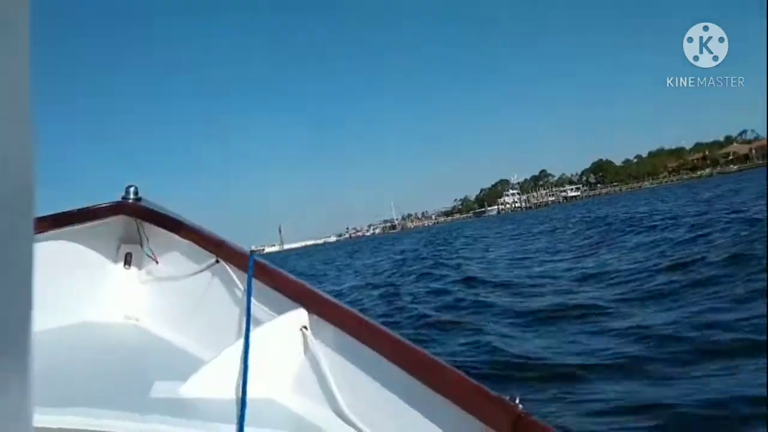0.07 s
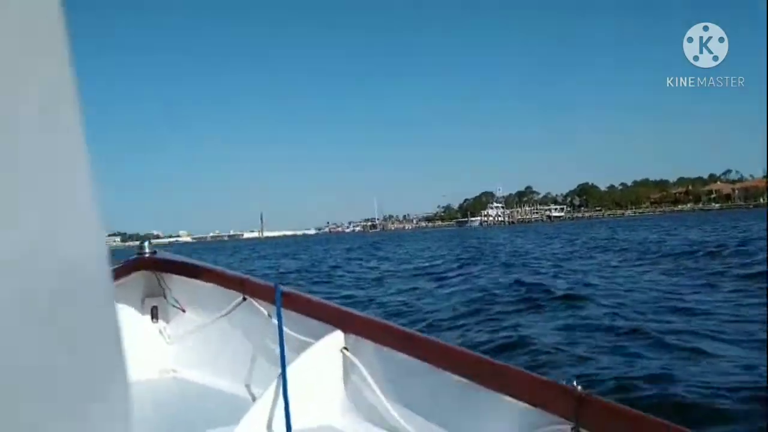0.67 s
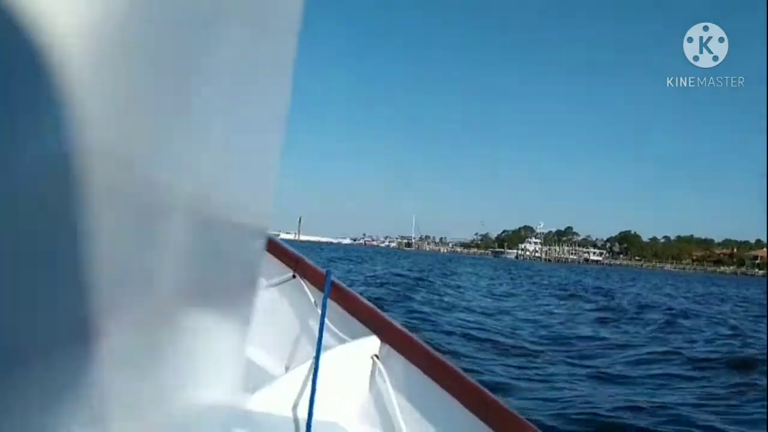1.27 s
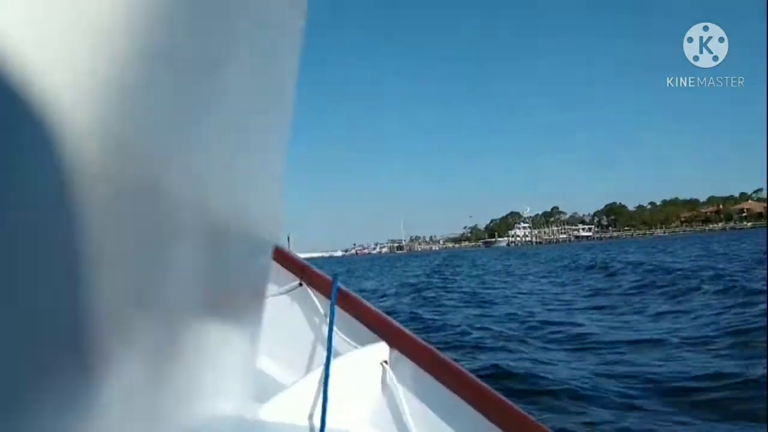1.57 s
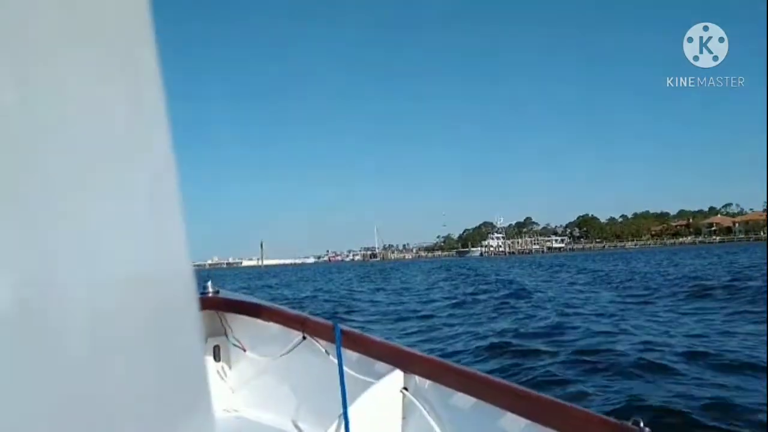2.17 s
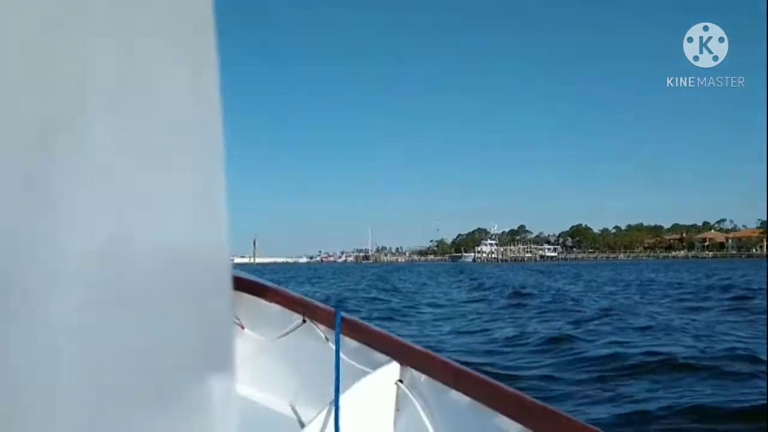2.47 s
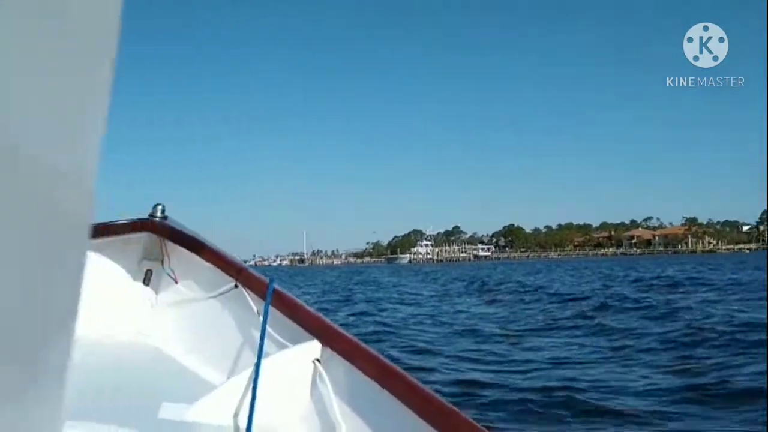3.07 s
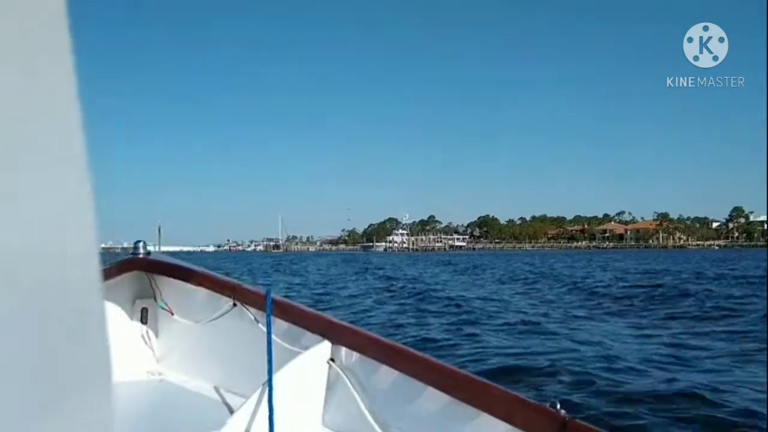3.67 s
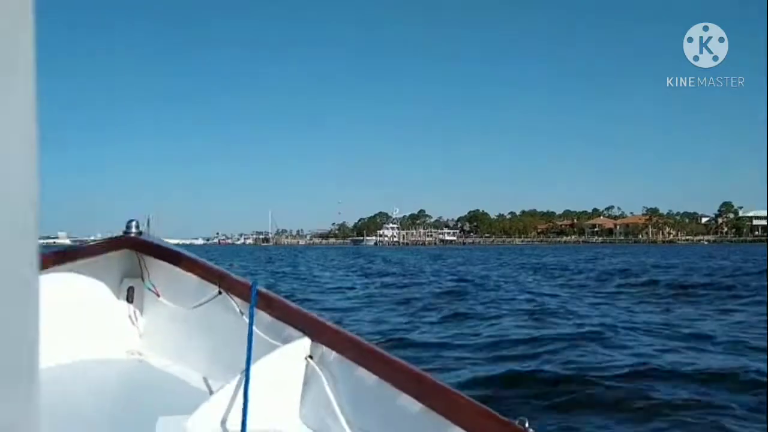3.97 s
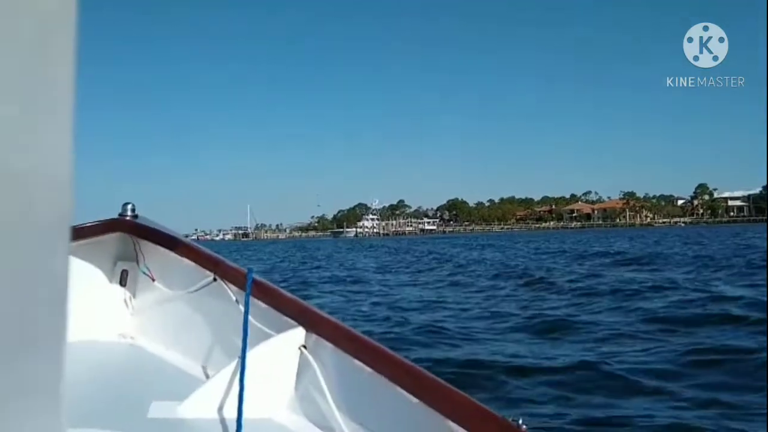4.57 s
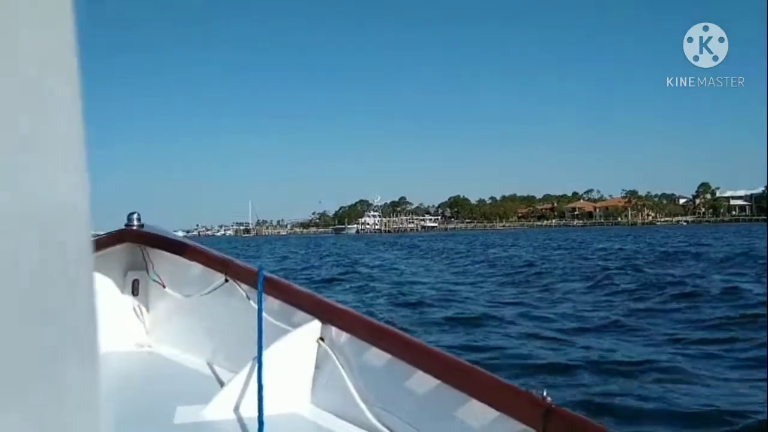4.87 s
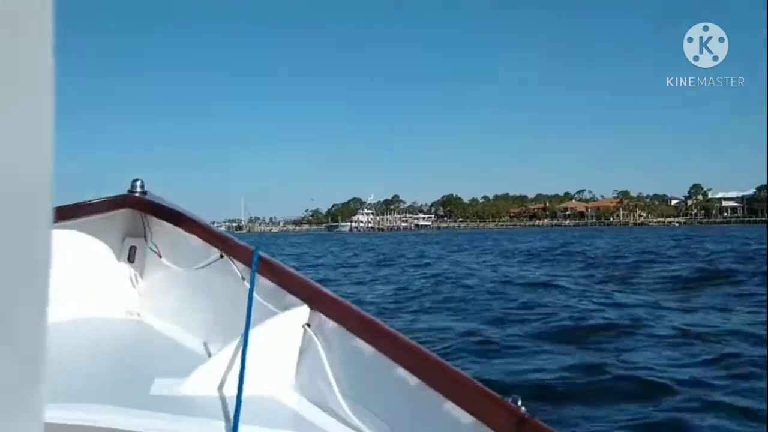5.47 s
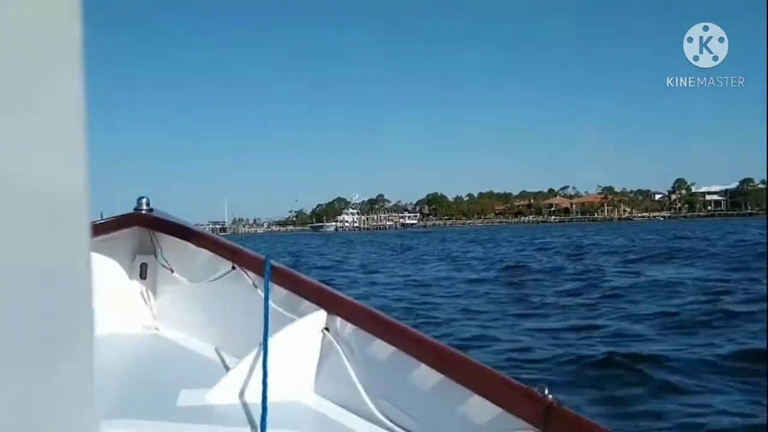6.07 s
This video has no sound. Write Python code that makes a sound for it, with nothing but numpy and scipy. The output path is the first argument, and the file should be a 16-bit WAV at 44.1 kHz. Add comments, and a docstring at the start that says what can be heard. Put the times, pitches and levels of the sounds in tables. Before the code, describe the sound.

Heard from aboard a small boat on open water, wind buffets the microphone in uneven gusts while waves slosh, gurgle and thud against the hull. Crests break on the bow, drops tick and wavelets knock underneath. After a calmer moment, the barely audible outboard motor opens up toward the end, its whine climbing in pitch over the rushing water.

```python
"""A small open boat pushes through choppy water, with wind buffeting the two microphone ports.
From the start, waves wash along the hollow hull, plop against the planks and slap air into booming pockets.
Crests break on the bow, drops tick, bubbles burst, and from one second on, wavelets knock underneath.
Near five seconds the outboard motor whines up from a faint idle, exhaust chugging, and the wash grows.
Throughout, each port is fed, late and inverted, into the other channel to widen the stereo image."""
import sys
import numpy as np
from scipy import signal
from scipy.fft import rfft, irfft, next_fast_len
from scipy.io import wavfile

SR = 44100
rng = np.random.default_rng(int(sys.argv[2]) if len(sys.argv) > 2 else 0)


def generate_wav(sig):
    """Save sig (samples, or channels by samples) to the path in sys.argv[1] as 16-bit PCM at SR."""
    pcm = np.round(np.clip(np.atleast_2d(sig).T, -1, 1) * 32767).astype(np.int16)
    wavfile.write(sys.argv[1], SR, pcm)


N = 278271
TIME = np.arange(N) / SR
MESHES_PER_CYCLE = 24   # gear teeth that engage in one engine cycle
# The motor idles, then speeds up. Each row: time in seconds, gear mesh rate in Hz.
MOTOR_SPEED = [(0, 298), (4.8, 299), (4.9, 326), (5.0, 374), (5.12, 404), (5.3, 432), (5.6, 450),
               (6.03, 463), (6.31, 485)]


def from_db(db):
    """Decibels to gain."""
    return 10 ** (np.asarray(db) / 20)


def rms_one(x):
    """Scale to unit rms."""
    return x / np.sqrt(np.mean(x ** 2) + 1e-20)


def automation(rows):
    """A curve through (seconds, value) points, at every sample."""
    return np.interp(TIME, *np.transpose(rows))


def add(out, start_s, sound):
    """Mix a sound in at its start time."""
    start = max(0, round(start_s * SR))
    out[..., start:start + sound.shape[-1]] += sound[..., :N - start]


def filtered(x, kind, hz, order=2):
    """Causal Butterworth filter."""
    return signal.sosfilt(signal.butter(order, hz, kind, fs=SR, output="sos"), x + 1e-18)


def resonance(x, hz, width_hz):
    """Two-pole band-pass with unity gain at its peak."""
    r = np.exp(-np.pi * width_hz / SR)
    feedback = [1, -2 * r * np.cos(2 * np.pi * hz / SR), r * r]
    return signal.lfilter(np.array([1, 0, -1]) * (1 - r * r) / 2, feedback, x)


def drift(rate):
    """Smooth random modulation of spread 1, changing about `rate` times a second."""
    hop, settle = 40, 2000
    r = np.exp(-2 * np.pi * hop * rate / SR)
    white = rng.standard_normal(N // hop + settle + 2)
    slow = signal.lfilter([1], [1, -2 * r, r * r], white)[settle:]
    return np.interp(np.arange(N) / hop, np.arange(len(slow)), rms_one(slow))


def coloured(x, spectrum):
    """Shape a signal with an EQ curve of (Hz, dB) points; unit rms."""
    size = next_fast_len(N)
    hz, db = np.transpose(spectrum)
    bin_hz = np.arange(size // 2 + 1) * SR / size
    gain = from_db(np.interp(np.log(bin_hz + 1), np.log(hz), db))
    return rms_one(irfft(rfft(x, size) * gain, size)[:N])


def noise(spectrum):
    """Smooth coloured noise; unit rms."""
    return coloured(rng.standard_normal(N), spectrum)


def at_ports(common, apart, apart_hz, apart_db):
    """Lows reach both ports alike, highs differ between them."""
    return common + from_db(apart_db) * filtered(apart, "high", apart_hz, order=1) * [[1], [-1]]


def wind(steady_db=-4.5, lumpy_db=4, eddies_per_s=30, eddy_db=10, puff_db=6, lee_db=-5):
    """Lumpy turbulence rumbles at both ports; single eddies thump the windward one."""
    # The breeze swells and slackens. Each row: time in seconds, relative level in dB.
    breeze = [(0, -21), (0.8, -19.5), (1.25, -32.5), (1.58, -19), (1.85, -30.5), (2.15, -17.5), (2.47, -41),
              (2.8, -26), (3.0, -35), (3.25, -18.5), (3.47, -32), (3.85, -30.5), (4.05, -19.5),
              (4.25, -19.5), (4.78, -26), (5.2, -24), (5.7, -14.5), (6.31, -29.5)]
    # The strongest eddies. Each row: start in seconds, relative level in dB.
    puffs = [(0.011, -4.5), (0.077, -9), (1.097, -12), (1.611, -17.5), (3.72, -16), (4.165, -6),
             (4.183, -8.5), (4.234, -13.5), (4.262, -14), (4.274, -3), (4.404, -17), (4.507, -15),
             (4.536, -11), (4.591, -3), (4.642, -14), (4.652, -14), (5.401, -5), (5.563, -6), (5.758, -6.5),
             (5.819, -8.5)]
    # Tone of the turbulence. Each row: frequency in Hz, relative level in dB.
    buffet_eq = [(20, -29.5), (40, -37.5), (70, -5), (125, 3), (200, -1), (300, -22.5), (450, -33),
                 (800, -32.5), (1600, -38), (4000, -73.5)]
    flow = from_db(automation(breeze))
    windward, lee = [from_db(steady_db + lumpy_db * drift(22)) * flow * noise(buffet_eq)
                     for port in range(2)]
    eddies = rng.random(N) < eddies_per_s / SR
    kicks = eddies * rng.uniform(0, 1, N) * flow * from_db(eddy_db)
    for start, db in puffs:
        kicks[round(start * SR)] += from_db(db + puff_db)
    low_hz, high_hz = 95, 290
    thumps = filtered(kicks, "band", [low_hz, high_hz]) * SR / (2 * high_hz)
    return np.array([windward + filtered(thumps, "low", 373), from_db(lee_db) * lee])


def each_cycle(cycles, harmonic_db):
    """A wavetable that loops once per engine cycle, its harmonics in random phase."""
    size = 8192
    harmonics = from_db(harmonic_db) * np.exp(2j * np.pi * rng.random(len(harmonic_db)))
    shape = irfft(np.append(0, harmonics), size) * size / 2
    return np.interp(cycles % 1, np.arange(size) / size, shape)


def gear_whine(cycles, uneven=.42, wander=.17, flutter_db=1.5, top_hz=3200, partials=8):
    """Uneven teeth give fluttering, rasping partials that swell as they climb through resonances."""
    # Resonances of the motor housing. Each row: frequency in Hz, width in Hz, gain in dB,
    # phase between the ports in degrees.
    housing = [(780, 40, -48, 35), (905, 40, -42.5, 55), (1370, 170, -42.5, 60), (1620, 90, -48.5, 100),
               (1950, 90, -53.5, 80), (2210, 160, -50, 130), (2470, 60, -54, 140), (2900, 300, -66.5, 35)]
    teeth = 0
    for k in range(1, partials + 1):
        phase = 2 * np.pi * k * MESHES_PER_CYCLE * cycles + wander * k * drift(50)
        lumps = 1 + uneven * each_cycle(cycles, -4 * np.arange(4))
        flutter = from_db(flutter_db * drift(30))
        teeth = teeth + np.sqrt(2) * lumps * flutter * np.exp(1j * phase)
    teeth = filtered(teeth, "low", top_hz, order=4)
    out = np.zeros((2, N))
    for hz, width, db, degrees in housing:
        port_phase = np.exp(np.array([[.5j], [-.5j]]) * np.radians(degrees))
        out += from_db(db) * resonance(np.real(teeth * port_phase), hz, width)
    return out


def exhaust(cycles, direct_db=-1, burble_db=-9):
    """Three uneven firings a cycle beat through the hull, and each blows a puff of bubbles."""
    # Outline of the beat's weaker harmonics. Each row: multiple of the engine cycle, relative level in dB.
    beat_outline = [(3, -22), (7, -7), (16, -6), (22, -11), (46, -28)]
    # Its strongest harmonics. Each row: multiple of the engine cycle, relative level in dB.
    strong_harmonics = [(4, -6), (6, 10), (10, 4), (13, 1), (14, 1), (17, 2)]
    # Resonances of the hull. Each row: frequency in Hz, width in Hz, gain in dB.
    hull_modes = [(180, 16, 0), (259, 18, 5), (325, 30, -7)]
    harmonic_db = np.interp(np.arange(1, 2 * MESHES_PER_CYCLE), *np.transpose(beat_outline))
    for multiple, db in strong_harmonics:
        harmonic_db[round(multiple) - 1] = db
    beat = each_cycle(cycles, harmonic_db) * from_db(1.8 * drift(25))
    firings = 1 + np.cos(2 * np.pi * 3 * cycles)
    burble = firings * rms_one(filtered(rng.standard_normal(N), "band", [130, 450]))
    chug = beat + from_db(burble_db) * burble
    hull_ring = sum(from_db(db) * resonance(chug, hz, width) for hz, width, db in hull_modes)
    return from_db(direct_db) * chug + hull_ring


def motor(exhaust_db=-36.3, exhaust_follows=.4):
    """One slightly unsteady speed drives gears and exhaust; the load brings both in."""
    # The throttle opens and loads the motor. Each row: time in seconds, gain in dB.
    load = [(4.76, -44), (4.82, -4), (4.96, -6.5), (5.1, -.5), (5.7, -.5), (6.0, -2.5), (6.25, 2.5)]
    mesh_hz = automation(MOTOR_SPEED) * (1 + .002 * drift(10))
    cycles = np.cumsum(mesh_hz) / SR / MESHES_PER_CYCLE
    load_db = automation(load)
    whine = from_db(load_db) * gear_whine(cycles)
    return whine + from_db(exhaust_db + exhaust_follows * load_db) * exhaust(cycles)


def bubble(t, hz, t60, rise):
    """A pocket of air rings down; its pitch climbs as it nears the surface."""
    t = np.maximum(t, 0)
    bend = 1 + rise * np.minimum(t / t60, 1)
    return np.sin(2 * np.pi * hz * t * bend) * from_db(-60 * t / t60)


def gurgle(per_s, low_hz, high_hz, cycles, spread_db, candidates=4000):
    """A crowd of small bubbles of random size and pitch; unit rms."""
    out = np.zeros(N)
    for when, pitch, size, chance in rng.random((candidates, 4)):
        if chance < per_s * N / SR / candidates:
            hz = low_hz * (high_hz / low_hz) ** pitch
            t60 = cycles / hz
            gain = from_db(spread_db * min(-np.log(1 - size), 4))
            add(out, when * (N - 1) / SR, gain * bubble(TIME[:int(t60 * SR)], hz, t60, rise=0.19))
    return rms_one(out)


def patter(spectrum, per_s, spread_db):
    """A hail of droplets of uneven size; unit rms."""
    sizes = from_db(spread_db * np.minimum(rng.exponential(1, N), 5)) * rng.choice([-1, 1], N)
    return coloured(sizes * (rng.random(N) < per_s / SR), spectrum)


def swell(start, length, t60, rise_s=.014):
    """One wave builds up, holds for its length and drains away."""
    t = np.maximum(TIME - start, 0)
    return (1 - np.exp(-t / rise_s)) * from_db(-60 * np.maximum(t - length, 0) / t60)


def water_strength(speed_ratio, idle_churn_db=-43.5, idle_spray_db=-58):
    """Gains of churn and spray: the steady wash grows with speed, and each wave adds its power."""
    # Waves run along the hull. Each row: start in seconds, length in seconds, churn and spray gains in dB.
    waves = [(0.015, 0.033, -31, -43.5), (0.322, 0.63, -32.5, -52), (0.597, 0.2, -24.5, -42.5),
             (0.824, 0.02, -25, -41.5), (1.097, 0.23, -29.5, -47.5), (1.373, 0.029, -28, -47.5),
             (1.738, 0.022, -25.5, -50), (1.917, 0.08, -28.5, -44), (2.09, 0.07, -24, -45.5),
             (2.537, 0.14, -30.5, -50), (2.905, 0.02, -38, -49.5), (3.239, 0.058, -32.5, -49),
             (3.46, 0.041, -38, -48), (3.953, 0.037, -30, -53), (4.152, 0.22, -54, -57),
             (4.586, 0.13, -35.5, -53.5), (4.789, 0.76, -33, -48.5), (5.725, 0.11, -25, -49.5)]
    octaves = np.log2(speed_ratio)
    churn_power = from_db(idle_churn_db + 6 * octaves) ** 2
    spray_power = from_db(idle_spray_db + 16 * octaves) ** 2
    for start, length, churn_db, spray_db in waves:
        churn_power += (from_db(churn_db) * swell(start, length, t60=0.81)) ** 2
        spray_power += (from_db(spray_db) * swell(start, length, t60=0.89)) ** 2
    return np.sqrt(churn_power), np.sqrt(spray_power)


def wash(rumble_db=1, spray_db=-1, glug_db=-10, fizz_db=-10, churn_flicker_db=2.5, spray_flicker_db=1.8):
    """Water drums along the hull, hisses off the bow and bursts into bubbles."""
    # Tones of the drumming water and of the spray. Each row: frequency in Hz, relative level in dB.
    rumble_eq = [(30, -59), (60, -36), (110, 10), (180, 10.5), (300, 7), (500, -4.5), (800, -14),
                 (1300, -25), (2000, -26), (4000, -53.5)]
    spray_eq = [(300, -13), (700, 15.5), (1300, 9), (1900, 1.5), (2400, 3.5), (3100, -3), (4200, -6.5),
                (5500, -14.5), (7000, -23.5), (10000, -23), (15500, -23)]
    speed_ratio = automation(MOTOR_SPEED) / MOTOR_SPEED[0][1]
    churn, spray = water_strength(speed_ratio)
    body_gain = from_db(rumble_db + churn_flicker_db * drift(14.5))
    body = body_gain * at_ports(noise(rumble_eq), noise(rumble_eq), apart_hz=1200, apart_db=5.5)
    droplets = [patter(spray_eq, per_s=7000, spread_db=3.5) for part in range(2)]
    hiss_gain = from_db(spray_db + spray_flicker_db * drift(25))
    hiss = hiss_gain * at_ports(*droplets, apart_hz=1500, apart_db=1.5)
    glugs = from_db(glug_db) * gurgle(per_s=130, low_hz=330, high_hz=1100, cycles=34, spread_db=2.8)
    glugs /= speed_ratio ** 2   # at speed the big bubbles are left behind
    fizz = np.array([gurgle(per_s=260, low_hz=1400, high_hz=3900, cycles=32, spread_db=5)
                     for port in range(2)])
    return churn * (body + glugs) + spray * (hiss + from_db(fizz_db) * fizz)


def drops(level_db=-8, t60=0.025):
    """Large drops land on the boat with tiny bright ticks."""
    # One row per drop: start in seconds, relative level in dB.
    landings = [(0.163, -41), (0.2378, -37), (0.8334, -47), (1.41, -38), (1.813, -42), (2.8424, -47)]
    out, t = np.zeros((2, N)), TIME[:SR // 20]
    for start, db in landings:
        bright = filtered(rng.standard_normal((2, len(t))), "high", 2200)
        tick = rms_one(filtered(bright, "low", 7000, order=1))
        add(out, start, tick * from_db(db + level_db - 60 * t / t60))
    return out


def plips(level_db=-3, t60=0.019):
    """Small bubbles ring briefly as they burst at the surface."""
    # One row per bubble: start in seconds, relative level in dB, pitch in Hz.
    bursts = [(.36, -37, 3240), (2.187, -33, 2960), (2.668, -38.5, 2920), (3.086, -45, 2880),
              (4.368, -40.5, 3200), (5.124, -36, 3300), (5.961, -28, 2470)]
    out = np.zeros(N)
    for start, db, hz in bursts:
        add(out, start, from_db(db + level_db) * bubble(TIME[:SR // 10], hz, t60, rise=0.011))
    return out


def plops(bubble_db=-5, splash_db=-10, splash_t60=0.14, cycles=24, scatter_s=0.01, spatter_db=-25):
    """A wavelet claps shut against the planks: a short splash and four quick bubbles."""
    # One row per wavelet: start in seconds, relative level in dB, pitch of the first bubble in Hz.
    wavelets = [(.033, -22, 510), (.325, -30, 730), (.912, -23.5, 1040), (1.16, -23, 720),
                (1.283, -21.5, 600), (1.391, -27, 645), (1.647, -28, 660), (1.796, -31, 770),
                (2.188, -23.5, 800), (2.79, -28.5, 790), (3.556, -24.5, 890), (3.948, -36.5, 630),
                (3.971, -26.5, 515), (4.131, -46, 480), (4.179, -27, 740), (5.786, -22.5, 607)]
    out, t = np.zeros((2, N)), TIME[:SR // 6]
    for start, db, hz in wavelets:
        white = rng.standard_normal((3, len(t)))
        clap = rms_one(filtered(white[0], "band", [0.039 * hz, 1300], order=3))
        spatter = from_db(spatter_db - splash_db) * rms_one(filtered(white[1:], "band", [1200, 3200]))
        sound = (clap + spatter) * from_db(splash_db - 60 * t / splash_t60)
        for k, (late, pitch) in enumerate(rng.random((4, 2))):
            own_hz = hz * 1.4 ** (2 * pitch - 1) if k else hz
            delay = late * scatter_s if k else 0
            ring = bubble(t - delay, own_hz, cycles / own_hz, rise=0.055)
            sound += from_db(bubble_db - 0.22 * k) * ring
        add(out, start, from_db(db) * sound)
    return out * from_db([[-.3], [.3]])


def splashes(level_db=-4, t60=0.11, rise_s=0.0042, crackle_db=-10):
    """A crest breaks against the bow and bursts into crackling droplets."""
    # One row per crest: start in seconds, relative level in dB.
    crests = [(0.657, -25.5), (0.747, -22), (0.831, -19.5), (0.849, -26), (2.114, -25), (2.175, -24),
              (2.336, -29.5), (2.547, -33), (3.557, -32.5), (4.173, -26), (5.777, -26.5)]
    # Tone of the splash. Each row: frequency in Hz, relative level in dB.
    splash_eq = [(150, -18), (400, 13.5), (800, 6.5), (1500, 1), (3200, -11.5), (5500, -34), (8000, -51.5),
                 (15000, -47)]
    envelope, t = np.zeros(N), TIME[:SR // 3]
    for start, db in crests:
        add(envelope, start, (1 - np.exp(-t / rise_s)) * from_db(db + level_db - 60 * t / t60))
    droplets = [patter(splash_eq, per_s=1300, spread_db=4) for part in range(2)]
    crackle = np.array([gurgle(per_s=450, low_hz=1800, high_hz=4600, cycles=14, spread_db=4)
                        for port in range(2)])
    return envelope * (at_ports(*droplets, apart_hz=1800, apart_db=7) + from_db(crackle_db) * crackle)


def knocks(level_db=-2.5, vary_db=2, lean_db=-1, cluck_db=-17, sag=.13, sag_s=0.0053):
    """Wavelets knock under the planks: a dry cluck, and a ring that sags in pitch as the gap opens."""
    # One row per knock: start in seconds, relative level in dB.
    hits = [(1.025, -14.5), (1.04, -28), (1.12, -11), (1.21, -12), (1.413, -14.5), (1.825, -10.5),
            (2.337, -14.5), (2.349, -16), (2.549, -13), (2.695, -13), (2.831, -16), (3.169, -21),
            (3.193, -18.5), (3.222, -21.5), (3.259, -19.5), (5.952, -14.5)]
    # Modes of the ring. Each row: centre pitch in Hz, relative level in dB, seconds to fall 60 dB.
    modes = [(497, -12.5, 0.071), (771, -6, 0.032), (1066, -12, 0.058), (1235, -16, 0.023)]
    out, t = np.zeros(N), TIME[:SR // 10]
    sagging_time = t + sag * sag_s * (1 - np.exp(-t / sag_s))
    attack = 1 - np.exp(-t / 0.002)
    for start, db in hits:
        cluck = rms_one(filtered(rng.standard_normal(len(t)), "band", [750, 1550], order=3))
        add(out, start, cluck * from_db(db + cluck_db - 60 * t / 0.036))
        for k, (hz, mode_db, t60) in enumerate(modes):
            strength, detune = rng.standard_normal(2)
            ring = (-1) ** k * attack * np.sin(2 * np.pi * hz * (1 + 0.055 * detune) * sagging_time)
            add(out, start, ring * from_db(db + mode_db + level_db + vary_db * strength - 60 * t / t60))
    return out * from_db([[lean_db], [-lean_db]])


def slaps(rise_s=0.0014, glide_s=0.0383, pocket_t60=0.099, hull_db=-9, hull_hz=(130, 450), hull_t60=0.25):
    """A wave booms in the hull; trapped air throbs unevenly, gliding as its pocket changes size."""
    # One row per slap: start in seconds, relative level in dB, hold in seconds,
    # the pocket's first pitch in Hz, the pitch it glides toward in Hz.
    hits = [(0.062, -19.5, 0.0054, 196, 186), (0.659, -12, 0.016, 206, 161), (0.732, -21, 0.0069, 334, 288),
            (0.848, -16, 0.006, 326, 286), (1.2, -16.5, 0.033, 196, 173), (2.123, -11, 0.014, 271, 245),
            (2.194, -20.5, 0.057, 263, 229), (2.553, -17.5, 0.075, 342, 125.5),
            (3.283, -23.5, 0.041, 164.4, 190), (3.481, -16.5, 0.0058, 325, 242),
            (3.504, -15, 0.066, 256.5, 137.6), (3.532, -31, 0.021, 755, 660),
            (3.559, -9.5, 0.0027, 259, 133), (3.57, -18.5, 0.016, 456, 330),
            (3.575, -41, 0.015, 1137, 1066), (3.97, -19.5, 0.023, 294, 156), (4.817, -20, 0.11, 246, 131.7),
            (4.845, -15.5, 0.0067, 347, 362), (6.073, -19.5, 0.027, 203, 217)]
    out, t = np.zeros(N), TIME[:SR // 2]
    attack = 1 - np.exp(-t / rise_s)
    for start, db, hold, first_hz, last_hz in hits:
        hz = last_hz + (first_hz - last_hz) * np.exp(-t / glide_s)
        wobble = .35 * rms_one(filtered(rng.standard_normal(len(t)), "low", 110))
        pocket = np.sin(2 * np.pi * np.cumsum(hz) / SR + wobble)
        pocket *= from_db(-60 * np.maximum(t - hold, 0) / pocket_t60)
        boom = rms_one(filtered(rng.standard_normal(len(t)), "band", hull_hz, order=3))
        boom *= from_db(hull_db - 60 * t / hull_t60)
        add(out, start, from_db(db) * attack * (boom + pocket))
    return out


def scene():
    """Water, motor and wind at the two ports."""
    return wash() + slaps() + splashes() + plops() + plips() + drops() + knocks() + motor() + wind()


def record(dry, cross=0.68, delay_s=0.000452, left_db=1.8, right_db=1.42, right_top_hz=11000, top_hz=15700):
    """Each channel subtracts the delayed other port, widening and combing the sound; the top is cut."""
    other = np.array([np.interp(TIME - delay_s, TIME, port, left=0) for port in dry[::-1]])
    wide = (dry - cross * other) / np.sqrt(1 + cross ** 2) * from_db([[left_db], [right_db]])
    wide[1] = filtered(wide[1], "low", right_top_hz, order=1)   # the right side is duller
    return signal.sosfilt(signal.ellip(12, .2, 80, top_hz, fs=SR, output="sos"), wide)


dry = scene()
out = record(dry)
generate_wav(out)
```